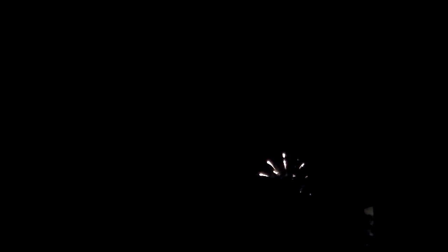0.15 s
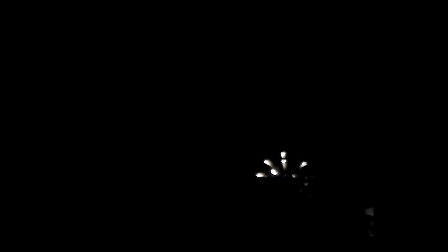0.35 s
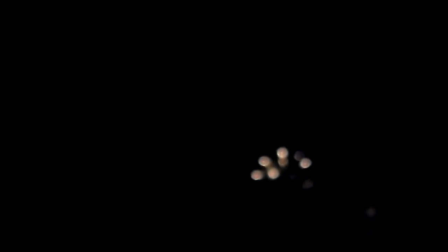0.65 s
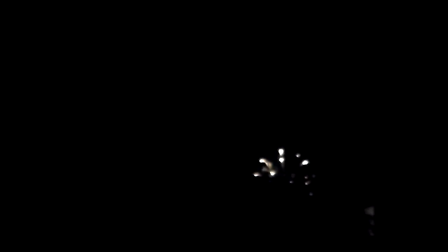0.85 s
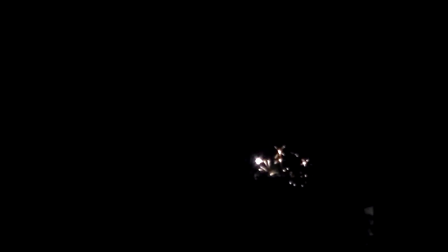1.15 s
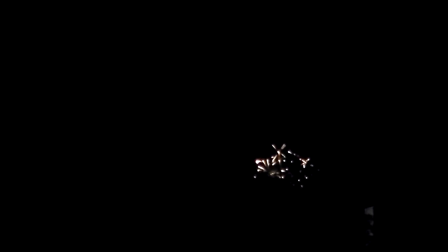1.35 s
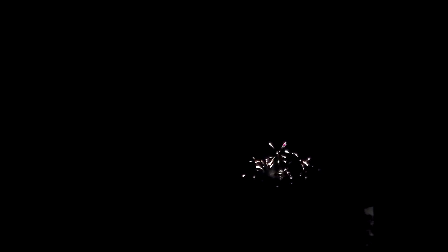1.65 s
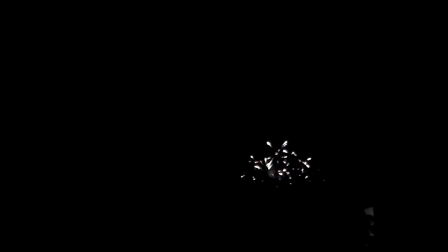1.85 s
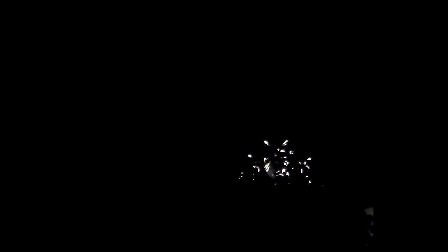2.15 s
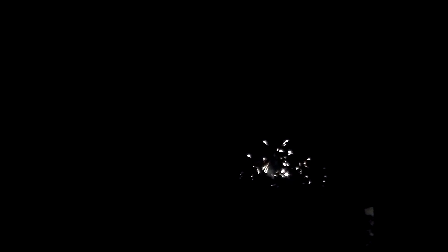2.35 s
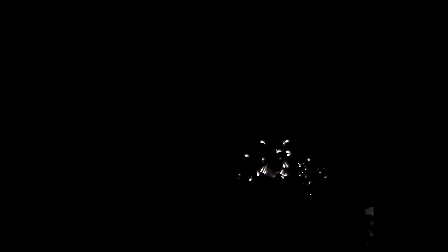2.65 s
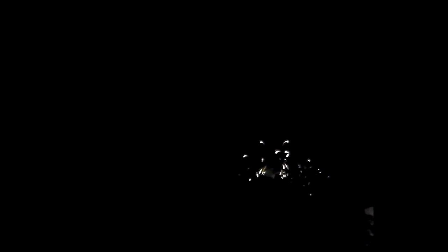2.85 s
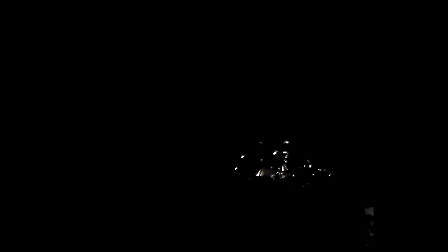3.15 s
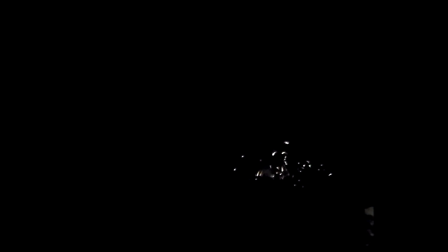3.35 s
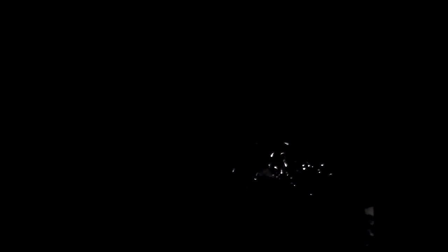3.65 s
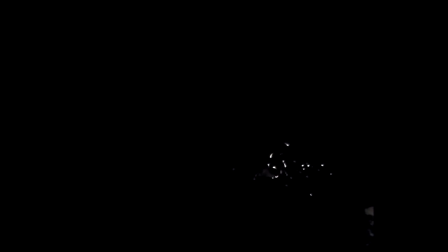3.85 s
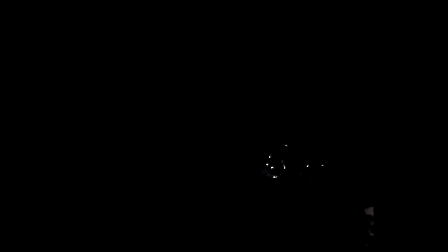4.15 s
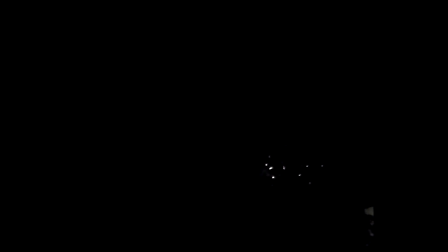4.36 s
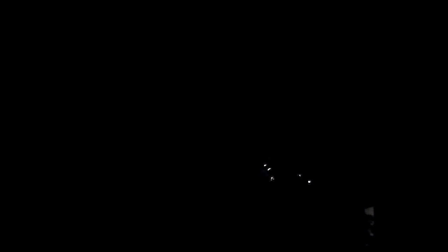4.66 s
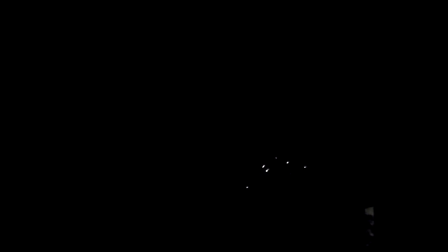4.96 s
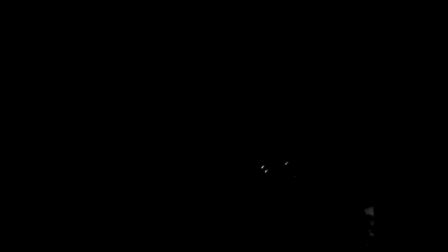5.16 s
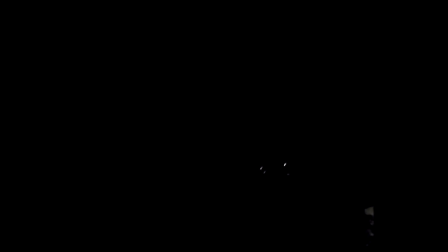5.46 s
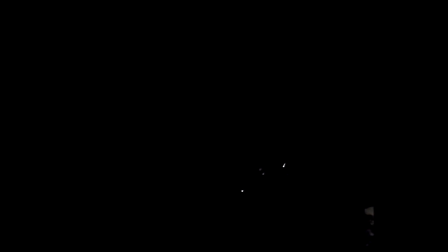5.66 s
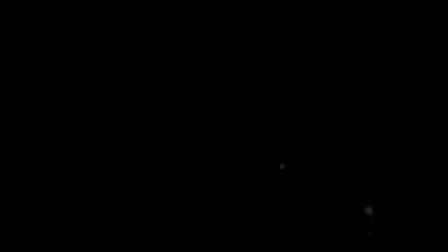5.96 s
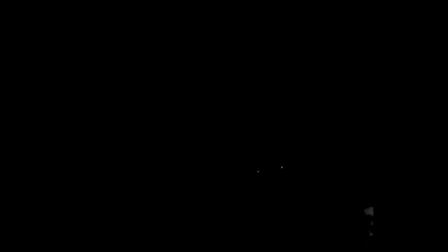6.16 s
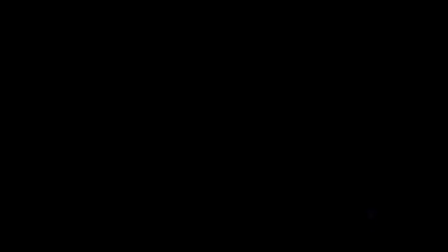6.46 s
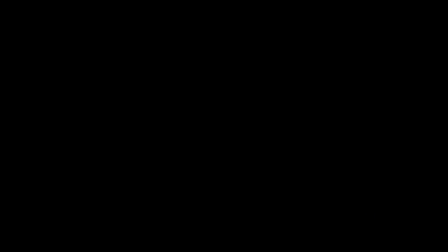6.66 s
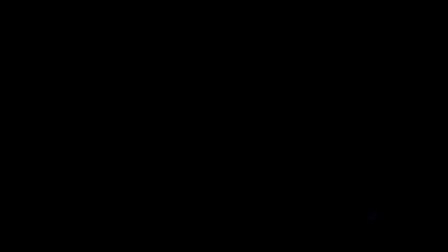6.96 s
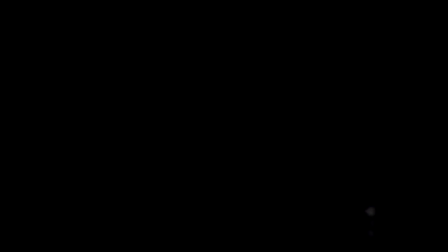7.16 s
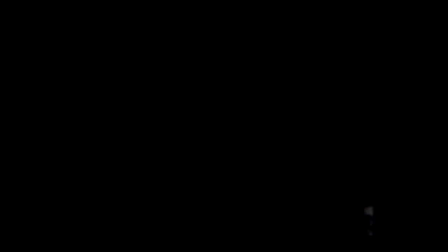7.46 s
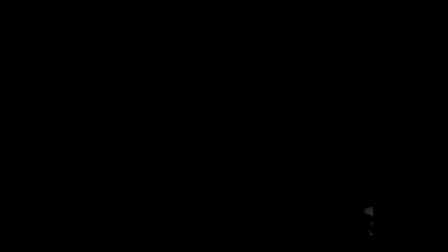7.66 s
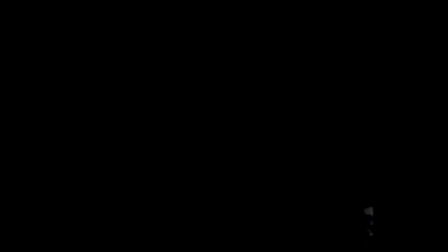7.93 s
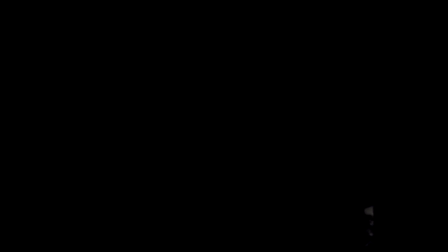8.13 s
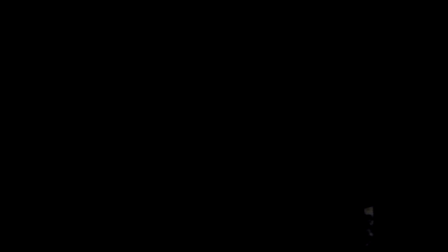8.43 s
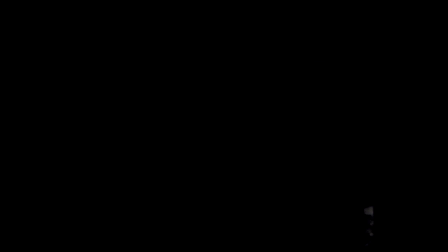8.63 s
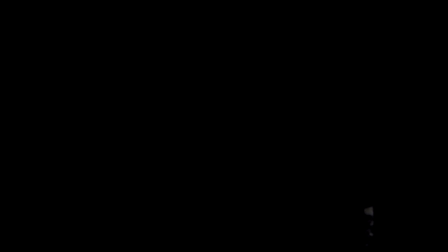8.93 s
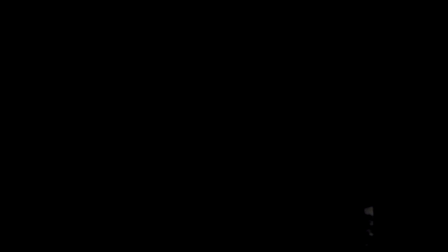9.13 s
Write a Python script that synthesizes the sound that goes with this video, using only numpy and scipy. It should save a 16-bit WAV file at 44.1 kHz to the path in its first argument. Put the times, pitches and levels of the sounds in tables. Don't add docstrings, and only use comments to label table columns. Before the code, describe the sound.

Night fireworks at a distance, with hard short echoes from walls and houses. Separate bangs come first: two sputtering comets that whoosh up and snap, the sharpest shell near three seconds, a deep one after four. Heavy pops then tumble into a tight run of brighter small bursts, and a crackling roar is left. The recorder's level ducks after each loudest bang; town rumble and light hiss lie beneath.

```python
import sys
import numpy as np
from scipy import signal
from scipy.fft import rfft, irfft, next_fast_len
from scipy.io import wavfile
from scipy.ndimage import uniform_filter1d

SR = 44100
rng = np.random.default_rng(int(sys.argv[2]) if len(sys.argv) > 2 else 0)


def put_to_file(sound):
    columns = np.atleast_2d(sound).T
    safe = np.clip(columns, -1, 1)
    whole_steps = np.round(safe * 32767)
    wavfile.write(sys.argv[1], SR, whole_steps.astype(np.int16))


def natural_amplitude(level_db):
    exponent = np.asarray(level_db, float) / 20
    return 10 ** exponent


N = 409688

# t/s, share of brighter crackle [0-1]
NEARER = [(0, 0.08), (2.6, 0.09), (3.3, 0.41), (4.3, 0.72), (5.5, 0.41), (6.5, 0.79), (7.6, 0.6),
          (8.2, 0.96), (9.29, 0.85)]


def blasts():
    # t/s, thump level/dB, slap level/dB, slap f/Hz
    booms = [(0.1941, -59, -24.5, 380), (0.2026, -61, -20.5, 348), (.2345, -51, -16.5, 354),
             (0.9834, -16, -25.5, 1140), (1.281, -52, -13, 360), (1.319, -36, -13, 380),
             (2.4075, -19.5, -27.5, 1030), (2.494, -22, -42, 614), (2.981, -36.5, -46, 600),
             (3.207, -37, -47, 605), (3.43, -30, -55, 596), (4.59, -44.5, -58, 586), (6.596, -40, -48, 600),
             (7.483, -34, -48, 588)]
    # t/s, spike level/dB, thump level/dB, spike width/s, ground echo gain
    bangs = [
        (0.4277, -11, -54, 0.00011, 0.059),
        (1.513, -25, -42, 0.00017, .02),
        (2.6795, 3, -9.5, 0.000098, 0.21),
        (4.34, -8.5, -9, 0.000097, 0.14),
    ]
    # f/Hz, width/Hz, level/dB
    big_modes = [(126.5, 97, 7.5), (214, 12, -19.5)]
    # f/Hz, width/Hz, level/dB
    small_modes = [(137, 43, -7), (232.5, 63, 0.5), (410, 99, -1)]
    # f/Hz, width/Hz, level/dB
    edge_modes = [(1630, 480, 17.5), (2280, 1600, 7)]
    # delay/s, signed gain
    walls = [(.0012, 0.26), (.0023, -0.37), (.0035, -0.26), (.0046, 0.31), (.0106, -.3), (.02, -0.088)]
    # delay/s, signed gain
    far_wall = [(.0088, 1), (.026, 0.49)]
    # delay/s, signed gain
    hedge = [(.0035, -0.85), (.0104, -0.74), (.017, .35)]

    deep, low, mid, high, near = np.zeros((5, N))
    for s, db, thump_db, edge_db, ring_hz in bursts():
        fence_db = -24 + 16 * np.interp(s, *np.transpose(NEARER))
        ring = modes([(ring_hz, 400, 0), (1070, 160, fence_db)])
        add(low, s, natural_amplitude(db + thump_db + 0.5) * arrivals(hedge, scatter_db=-22.5))
        add(mid, s, natural_amplitude(db + 13) * filtered(arrivals(walls, scatter_db=-26.5), ring))
        add(high, s, natural_amplitude(db + edge_db - 6) * arrivals(walls[1:4], scatter_db=-30))

    for s, thump_db, slap_db, slap_hz in booms:
        slap = modes([(slap_hz, 220, 0)])
        add(deep, s, natural_amplitude(thump_db - 1.5) * arrivals(far_wall, scatter_db=-28))
        add(mid, s, natural_amplitude(slap_db) * filtered(arrivals([], scatter_db=-24.5), slap))

    t = np.arange(-40, 41) / SR
    for s, spike_db, thump_db, width_s, ground in bangs:
        thump = arrivals([(.0085, 0.52), (.03, 0.16)], scatter_db=-22.5)
        add(deep, s - .0008, natural_amplitude(thump_db - 8.5) * thump)
        echoes = [(.00115, ground), (.0017, 0.32 * ground), (.003, 0.43 * ground)]
        spike = np.exp(-.5 * (t / width_s) ** 2)
        add(near, s + t[0], natural_amplitude(spike_db) * np.convolve(arrivals(echoes, scatter_db=-39.0), spike))

    thumps = soften(deep, hz=316, table=big_modes) + soften(low, hz=797, table=small_modes)
    edges = soften(soften(high, hz=2600, table=edge_modes), hz=3230)
    return thumps + soften(mid, hz=1240) + edges + near


def bursts():
    # t/s, peak level/dB, thump level/dB, edge level/dB, ring f/Hz
    sputters = [
        (0.1964, -48, 12.5, -38, 467),
        (0.2325, -42, -14, -33, 430),
        (0.2567, -40, -24, -15, 640),
        (0.2817, -38, -10, -16, 606),
        (0.4271, -16.5, -46, -20, 700),
        (1.2771, -32.5, 3, -42, 510),
        (1.3161, -26, -29, -18, 474),
        (1.3476, -47, -20, -12, 630),
        (1.375, -38, -24, -17, 594),
        (1.5111, -17.5, -9, -6, 716),
    ]
    # t/s, peak level/dB, thump level/dB, edge level/dB
    heavy = [(4.7018, -39, -3, -49), (4.8218, -54, -1, -6), (4.8806, -21.5, -8.5, -5),
             (4.951, -23.5, 0, -16), (5.0602, -23.5, 1.5, -6), (5.1112, -21.5, -3, -20),
             (5.228, -19.5, -12, -15), (5.255, -21, 0, -11), (5.2755, -34.5, 11, -14),
             (5.282, -27.5, -15, -5), (5.4056, -27, 6.5, -15), (5.423, -18, -4, -12), (5.4376, -31, 3, -28),
             (5.6369, -25.5, 2.5, -12), (5.6756, -24.5, 2.5, -8.5), (5.7197, -24, 0, -23),
             (5.8382, -23.5, 1, -9), (5.8995, -25.5, -3, -4), (6.171, -22.5, 1, -5.5)]
    # t/s, peak level/dB, thump level/dB, ring f/Hz
    small = [(6.701, -23.5, -10, 970), (6.7354, -27.5, -0.5, 660), (6.752, -27, -8, 730),
             (6.764, -31, -4, 806), (6.7989, -23, -5, 704), (6.822, -24.5, -3, 784),
             (6.8444, -22, -20, 890), (6.859, -18, -5, 520), (6.881, -23, -3.5, 760),
             (6.943, -31, -21, 830), (6.962, -21, -22, 790), (7, -26, -22, 805), (7.028, -23.5, 0.5, 730),
             (7.0368, -18.5, -17, 970), (7.0448, -21.5, -3.5, 675), (7.078, -28, 3, 650),
             (7.1006, -19.5, -13, 620), (7.125, -25, -4, 740), (7.1648, -19, -13, 720),
             (7.1786, -24, -6, 700), (7.2359, -32, -0.5, 736), (7.2766, -21.5, -25, 660),
             (7.3111, -30.5, 0.5, 666), (7.3815, -20, -5, 750), (7.429, -30.5, -1, 635),
             (7.6224, -33, -17, 806), (7.7832, -22.5, -1, 730), (7.865, -23.5, -1, 610),
             (7.8892, -33, -4, 582), (7.9173, -34.5, -3, 750)]

    salvo = []
    for (s, db, thump_db, edge_db), chance in zip(heavy, rng.standard_normal(len(heavy))):
        ring_hz = 630 * (1 + 0.027 * chance) - 3.5 * thump_db
        salvo.append((s, db, thump_db, edge_db, ring_hz))

    run = []
    for (s, db, thump_db, ring_hz), chance in zip(small, rng.standard_normal(len(small))):
        edge_db = -17.5 + 26 * np.log2(ring_hz / 730) + 5 * chance
        run.append((s, db, thump_db, edge_db, ring_hz))
    return [*sputters, *salvo, *run]


def arrivals(echoes, scatter_db):
    t = np.arange(SR // 12) / SR
    path = natural_amplitude(scatter_db - 60 * t / 0.12) * (1 - np.exp(-t / 0.00057)) * rng.standard_normal(len(t))
    path[0] = 1
    for (delay_s, gain), chance in zip(echoes, rng.standard_normal(len(echoes))):
        path[round(delay_s * SR)] += gain * natural_amplitude(1.5 * chance)
    return -path


def soften(x, hz, table=None):
    body = modes(table) if table else np.ones_like
    return filtered(x, lambda f: body(f) / (1 + 1.4j * f / hz - (f / hz) ** 2) ** 2)


def modes(table):
    def response(f):
        return sum(natural_amplitude(db) * SR / (2 * np.pi) * 1j * f / (centre_hz ** 2 - f * f + 1j * f * width_hz)
                   for centre_hz, width_hz, db in table)
    return response


def cracks():
    # t/s, peak level/dB
    fronts = [(0.4266, -31), (1.5118, -27), (2.6793, -25), (4.341, -29), (4.8803, -59), (5.23, -31),
              (5.2544, -30), (5.4219, -31), (5.8388, -31), (6.7012, -46), (7.0394, -36), (7.1653, -26.5)]
    out, t = np.zeros(N), np.arange(SR // 50) / SR
    for s, db in fronts:
        click = 0.034 * natural_amplitude(-60 * t / 0.0093) * rng.standard_normal(len(t))
        click[0] = -1
        add(out, s, natural_amplitude(db + 14.0) * click)
    return filtered(out, lambda f: (1j * f / 2000 / (1 + 1j * f / 2000)) ** 3 / (1 + 1j * f / 4500) ** 2)


def comets():
    # start t/s, end t/s, whoosh level/dB, fizz level/dB
    flights = [
        (0.249, 0.418, -32, -53.5),
        (1.332, 1.52, -27, -46.5),
    ]
    # f/Hz, density/dB
    whoosh_spectrum = [(180, -49), (300, -23), (409, -15), (575, 2.5), (1150, -18), (1320, -19),
                       (1660, -13), (2100, -28), (2730, -61), (4620, -120)]
    # f/Hz, density/dB
    fizz_spectrum = [(1500, -40), (2100, 0.5), (2580, 8.5), (3050, -1), (3530, 0), (4100, -7), (6000, -22),
                     (8000, -60)]
    whoosh, fizz = np.zeros((2, N))
    for start, end, whoosh_db, fizz_db in flights:
        burn_db, = curves([(start - .03, -150), (start - .008, -40), (start, -9), (start + 0.03, 0),
                           (start + 0.03 + .06, -8), (end, -17.5), (end + 0.15, -150)])
        whoosh = whoosh + natural_amplitude(whoosh_db + burn_db)
        fizz = fizz + natural_amplitude(fizz_db + 0.58 * burn_db)
    return (whoosh * rush(whoosh_spectrum, side_db=-17.0, patchy_db=1.8)
            + fizz * rush(fizz_spectrum, side_db=-8.5, patchy_db=3.0))


def yard(x):
    # f/Hz, t60/s
    t60_s = [(100, 0.13), (600, 0.4), (2000, 0.03), (8000, 0.27)]
    hz, t, z = signal.stft(rng.standard_normal((2, SR // 2)), SR, nperseg=256)
    decay = natural_amplitude(-60 * t / along(t60_s, hz)[:, None])
    tail = signal.istft(z * decay, SR, nperseg=256)[1]
    tail = np.array([tail[0] + .12 * tail[1], tail[0] - 0.3 * tail[1]])
    late = np.pad(x, (600, 0))[None]
    return signal.fftconvolve(late, tail / np.linalg.norm(tail[0]), axes=1)[:, :N]


def roar():
    # t/s, level/dB
    star_levels = [(0, -46.5), (.2, -53), (.36, -38), (1.0, -42.5), (1.35, -44.5), (1.5, -37.5),
                   (2.25, -40), (2.4, -44.5), (2.66, -48.5), (3.4, -42.5), (5.09, -42.5), (5.25, -38.5),
                   (5.43, -41), (6.6, -38.5), (6.9, -37.5), (7.3, -37.5), (9.29, -38.5)]
    # f/Hz, density/dB
    bright_spectrum = [(190, -53), (330, -6), (390, -7.5), (424, -2), (598, -1), (769, -3), (880, 1.5),
                       (1070, 4), (1170, 0), (1320, -3.5), (1890, -6), (2610, -18), (3080, -30),
                       (4000, -62), (5200, -70), (8800, -120)]
    # f/Hz, density/dB
    dull_spectrum = [(190, -21), (330, -1), (461, -5.5), (562, -0.5), (715, 0), (1050, -12.5), (1130, -7.5),
                     (1320, -35), (1390, -17), (1740, -14.5), (2140, -31), (2660, -24.5), (2890, -34),
                     (4000, -37.5), (5200, -75), (8800, -120)]
    # f/Hz, density/dB
    rumble_spectrum = [(35, -75), (60, -9.5), (118, 2.5), (188, -8.5), (232, -2), (290, -9), (328, -16.5),
                       (380, -17.5), (490, -24), (840, -120)]
    # f/Hz, density/dB
    breeze_spectrum = [(12, -14), (25, 13.5), (45, 4), (70, -3), (110, -44.5)]
    # t/s, level/dB
    gusts = [(.7, -1), (.97, 5.5), (1.3, -3), (1.55, -1), (3.2, 2), (4.2, 3.5), (4.7, -1), (7.3, -5.5),
             (9.29, -3)]
    # f/Hz, density/dB
    hiss_spectrum = [(1880, 2), (3200, -3.5), (3850, -4.5), (12700, -8), (14000, -8.5)]
    # t/s, level/dB
    ride = [(0, 1), (1.4, 2.5), (2.6, 1.5), (6, -0.5), (6.5, 2.5), (7.2, 0), (7.55, 4), (8.6, 4.5),
            (9.29, 2)]

    stars_db, gain_db = curves(star_levels)[0], ducking(quick=0.87)
    share = np.clip(curves(NEARER)[0], 0, 1)
    bright = np.sqrt(share) * rush(bright_spectrum, side_db=-18.5, patchy_db=1.5)
    dull = np.sqrt(1 - share) * rush(dull_spectrum, side_db=-21, patchy_db=2.0)
    crackle = natural_amplitude(stars_db + gain_db) * (bright + dull)

    preamp_db = -69.5 + curves(ride)[0] + ducking(quick=.4)
    hiss_db = 10 * np.log10(natural_amplitude(preamp_db) ** 2 + natural_amplitude(-75.5) ** 2)
    hiss = natural_amplitude(hiss_db + 8.5) * rush(hiss_spectrum, side_db=0.3, patchy_db=0)

    town_power = natural_amplitude(-43.5 + 0.1 * (stars_db - stars_db.mean())) ** 2
    rumble_db = 10 * np.log10(town_power + rolls()) + 0.96 * gain_db
    rumble = natural_amplitude(rumble_db + 1.0) * rush(rumble_spectrum, side_db=-25.5, patchy_db=0.84)
    breeze_db = 1.3 * (hiss_db + 69) - 51 + curves(gusts)[0]
    breeze = natural_amplitude(breeze_db) * rush(breeze_spectrum, side_db=-16, patchy_db=3)
    return crackle + (rumble + breeze) * natural_amplitude([[.7], [-.7]]) + hiss


def rolls():
    # t/s, level/dB
    echoes = [(-.05, -40), (1.02, -36), (1.1, -35.5), (1.21, -47), (2.5, -42), (2.66, -35.5), (3.4, -39),
              (4.36, -26.5), (5.22, -38.5), (6.85, -32)]
    rise_s, t60_s = 0.014, 1.52
    power = 0
    for s, db in echoes:
        power = power + (natural_amplitude(db - 60 * since(s) / t60_s) * (1 - np.exp(-since(s) / rise_s))) ** 2
    return smooth(power)


def ducking(quick):
    # t/s, depth/dB, sinking time/s, return time/s
    drops = [
        (-.3, 7, .03, 0.07),
        (.44, 23.5, .04, 0.065),
        (1.51, 19.5, 0.083, 0.14),
        (2.68, 22, 0.23, 0.064),
        (4.34, 21, 0.043, 0.047),
    ]
    hold_s = 0.46
    depth_db = 0
    for s, db, sink_s, back_s in drops:
        sinking = 1 - np.exp(-since(s) / (quick * sink_s))
        depth_db = depth_db + db * sinking * np.exp(-since(s + hold_s) / back_s)
    return -smooth(depth_db)


def ticks():
    # t/s, level/dB
    grit = [(.991, -60), (1.4727, -44), (2.441, -51), (5.0712, -56), (5.232, -61), (7.846, -47)]
    out, t = np.zeros(N), np.arange(SR // 150) / SR
    for s, db in grit:
        add(out, s, natural_amplitude(db + 13.5 - 60 * t / 0.017) * rng.standard_normal(len(t)))
    return filtered(out, lambda f: (1j * f / 2400 / (1 + 1j * f / 2400)) ** 2 / (1 + 1j * f / 6000) ** 2)


def insects():
    # start t/s, end t/s, f/Hz, level/dB, width/Hz
    calls = [
        (1.0, 1.274, 6480, -80, 45),
        (7.537, 7.75, 4150, -70, 600),
    ]
    out, t = np.zeros(N), np.arange(N) / SR
    for start, end, hz, db, width_hz in calls:
        noise = rng.standard_normal(N)
        narrow = unit(filtered(noise, lambda f: np.exp(-((f - hz) / width_hz) ** 2)))
        out += natural_amplitude(db) * ((t > start) & (t < end)) * narrow
    return out


def rush(spectrum, side_db, patchy_db):
    z = signal.stft(rng.standard_normal((2, N + 512)), nperseg=512)[2]
    field = uniform_filter1d(rng.standard_normal(z.shape[1:]), 4, 0)
    field = uniform_filter1d(field, 8, 1)
    pair = signal.istft(z * natural_amplitude(patchy_db * unit(field)), nperseg=512)[1][:, :N]
    mid, side = filtered(pair, lambda hz: natural_amplitude(along(spectrum, hz)))
    return unit(np.array([mid + natural_amplitude(side_db) * side, mid - natural_amplitude(side_db) * side]))


def filtered(x, response):
    m = next_fast_len(x.shape[-1] + 2 ** 11, True)
    return irfft(rfft(x, m) * response(np.fft.rfftfreq(m, 1 / SR)), m)[..., :x.shape[-1]]


def add(track, s, sound):
    i = round(s * SR)
    track[..., i:i + sound.shape[-1]] += sound[..., :track.shape[-1] - i]


def unit(x):
    return x / np.sqrt(np.mean(x ** 2) + 1e-20)


def along(points, hz):
    f, v = np.transpose(points)
    return np.interp(np.log(hz + 1), np.log(f + 1), v)


def curves(rows):
    s, *cols = np.transpose(rows)
    return [np.interp(np.arange(N) / SR, s, c) for c in cols]


def since(s):
    return np.clip(np.arange(0, N / SR + .001, .001) - s, 0, None)


def smooth(slow):
    return np.interp(np.arange(N) / SR, since(0), slow)


def scene():
    # f/Hz, level/dB
    lean_left = [(100, 0.86), (500, 0.46), (3000, 1)]
    sky = blasts() + cracks()
    direct = filtered(sky, lambda hz: natural_amplitude(along(lean_left, hz) * np.array([[1], [-1]])))
    return direct + natural_amplitude(-22.0) * yard(sky) + roar() + comets() + insects() + ticks()


def top_cut(x):
    return signal.sosfilt(signal.butter(12, 14390, fs=SR, output="sos"), x)


def record(dry):
    mix = np.clip(dry, -1, 1)
    return top_cut(mix)


dry = scene()
out = record(dry)
put_to_file(out)
```